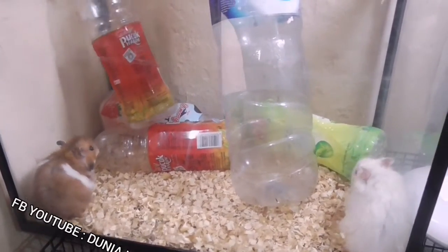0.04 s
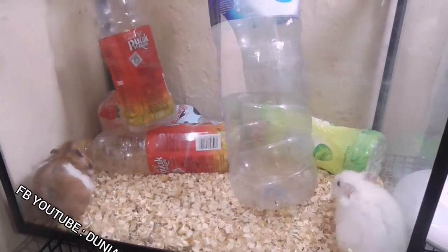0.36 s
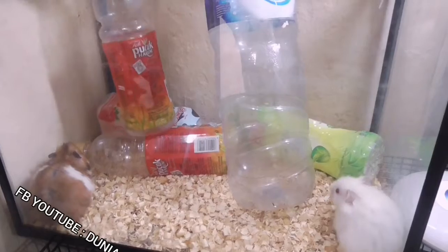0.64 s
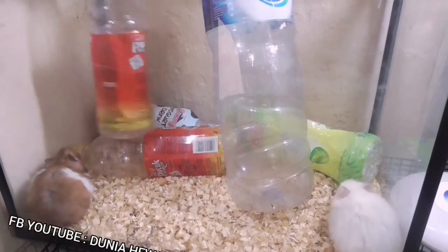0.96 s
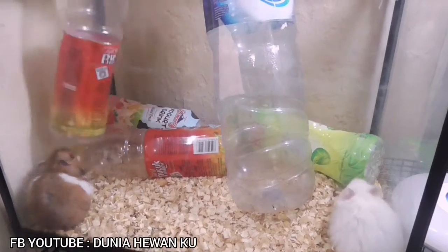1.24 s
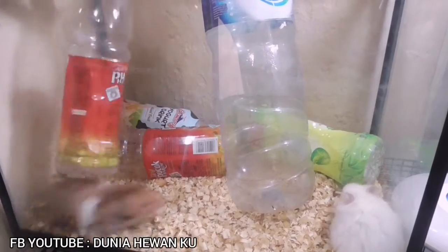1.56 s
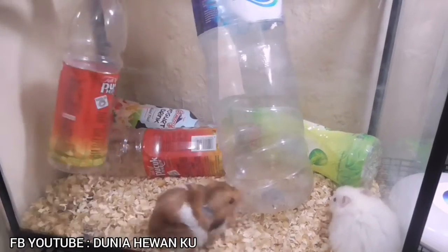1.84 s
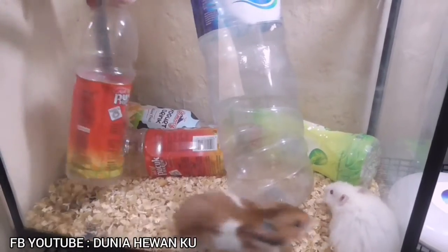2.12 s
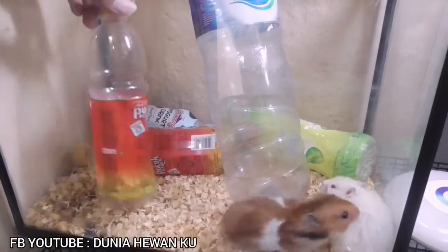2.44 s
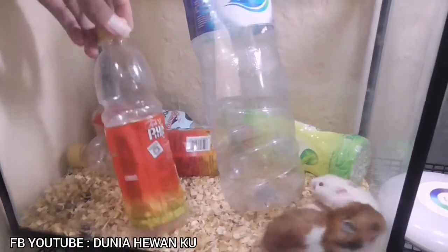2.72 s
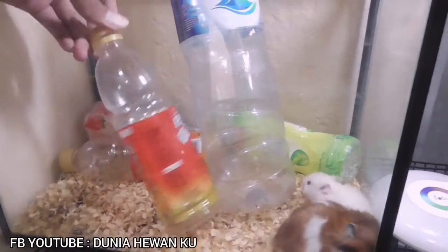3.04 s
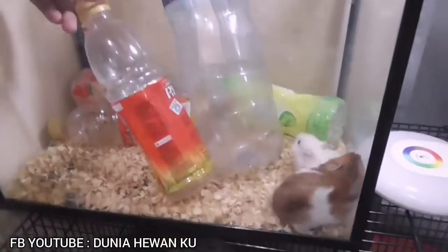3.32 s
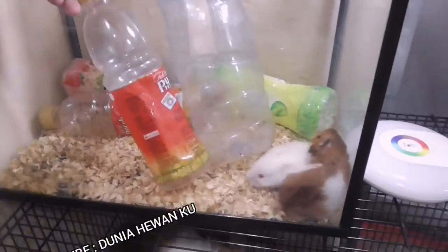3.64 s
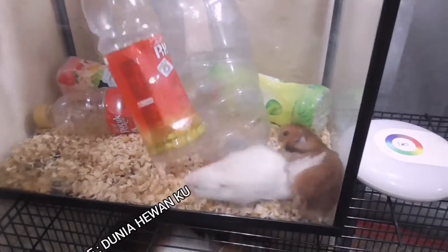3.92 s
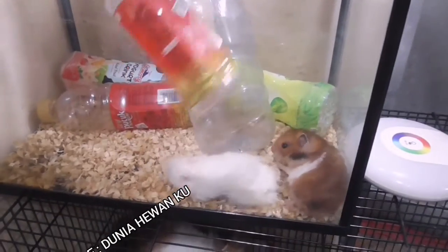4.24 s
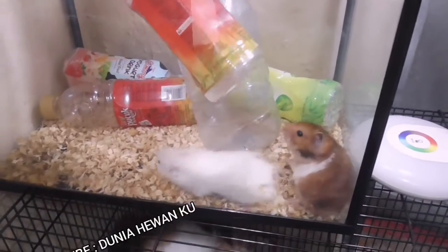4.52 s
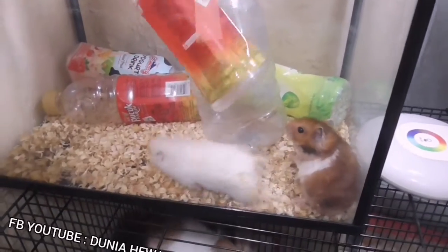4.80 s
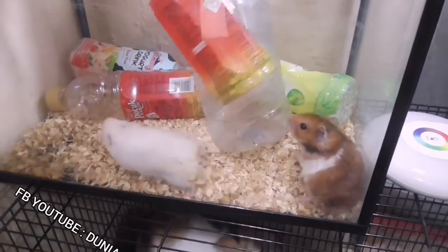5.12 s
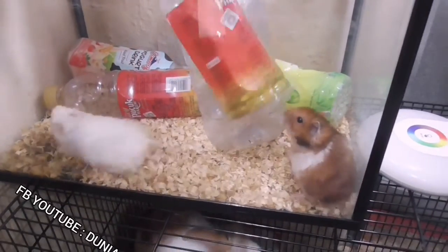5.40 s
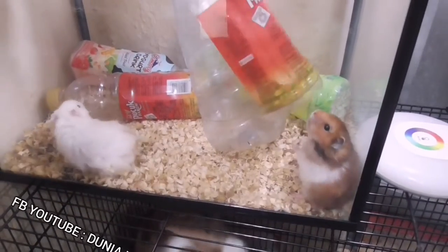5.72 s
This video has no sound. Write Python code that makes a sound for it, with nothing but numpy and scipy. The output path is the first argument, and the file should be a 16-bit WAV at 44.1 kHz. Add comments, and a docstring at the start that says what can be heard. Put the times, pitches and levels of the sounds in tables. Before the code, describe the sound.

Hollow plastic bottle knocks come in short chattering clusters inside a glass tank, while hamsters faintly scuff through shavings in a quiet room.

```python
"""Hollow knocks and chatter: an empty plastic bottle hits other bottles and the wall of a small glass tank.
Each blow clacks the thin plastic, rings a hollow note and booms in the tank; between blows the bottles rub.
Hamsters scurry through wood shavings in short crackles, over a quiet room with low hum and hiss.
A few faint puffs of narrow-band noise thin to a tone as they fade."""
import sys
import numpy as np
from scipy import signal
from scipy.fft import rfft, irfft, next_fast_len
from scipy.io import wavfile
from scipy.ndimage import uniform_filter1d

SR = 44100
rng = np.random.default_rng(int(sys.argv[2]) if len(sys.argv) > 2 else 0)


def transcribe(u):
    """Save the signal u as a 16-bit wav file named by the first command-line argument.

    u: samples, shape (n,) or (channels, n), limited to [-1, 1]; the rate is SR.
    q: integer samples, one column per channel.
    """
    v = np.clip(np.atleast_2d(u).T, -1, 1)
    q = np.round(v * 32767).astype(np.int16)
    wavfile.write(sys.argv[1], SR, q)


N = 254004
T = np.arange(N) / SR
LN_1000 = np.log(1000)  # 60 dB of decay

# low hum: time_s, level_db
HUM_LEVEL = [(0, -55), (.5, -59), (.9, -51.5), (2.4, -48.5), (2.65, -56.5), (5.76, -61.5)]
# room air: freq_hz, gain_db
AIR_SPECTRUM = [(20, -33.5), (45, -10), (70, -10.5), (95, -5.5), (135, -1.5), (200, 3), (235, -12),
                (272, 1), (330, -8.5), (420, -14), (495, -3.5), (600, -21.5), (1050, -18), (2000, -37)]
# hiss: freq_hz, gain_db
HISS_SPECTRUM = [(500, -33), (2000, -2.5), (3300, -7.5), (4200, -3.5), (4650, 1), (5200, -12), (6300, -8.5),
                 (7800, 1), (10000, 1), (12500, -3.5), (15500, -7.5)]
# puffs of narrow-band noise: start_s, pitch_hz, level_db, t60_s
NOISE_PUFFS = [(0.0, 2910, -72, 2.1), (.645, 3030, -60.5, 0.83), (1.15, 9000, -68, 0.6),
               (2.707, 2400, -62.5, 0.94), (2.927, 2410, -55.5, 0.62), (2.929, 3560, -60, 0.38),
               (3.741, 2315, -60, 1.47), (4.254, 7060, -58.5, 0.58), (4.78, 2730, -57.5, 0.78)]
# paw scuffs: start_s, level_db, length_s
PAW_SCUFFS = [(0.274, -55.5, 0.022), (0.996, -59, 0.017), (1.54, -47, 0.024), (1.606, -48.5, 0.046),
              (1.667, -51, 0.025), (1.731, -47.5, 0.017), (1.786, -50, 0.01), (1.809, -46, 0.018),
              (2.366, -56.5, 0.018), (3.07, -60.5, 0.078), (3.544, -57, 0.016), (3.656, -58.5, 0.02),
              (4.194, -54.5, 0.0063), (5.09, -57, 0.011), (5.27, -58, 0.011)]
# wood shavings: freq_hz, gain_db
SHAVINGS_SPECTRUM = [(400, 10), (1200, 10.5), (2200, -1.5), (4200, -0.5), (6000, -3), (8500, 3),
                     (12000, -2.5), (15500, -12.5)]
# how hard the bottles rub: time_s, level_db
RUB_LEVEL = [(0, -48.5), (.5, -52.5), (1.04, -54), (1.2, -67), (1.6, -42.5), (1.8, -50), (2.2, -48),
             (2.6, -65.5), (2.9, -49), (3.25, -46), (3.72, -52.5), (4.03, -41.5), (4.2, -51.5),
             (4.35, -46.5), (4.6, -77), (5.05, -48.5), (5.3, -54.5), (5.75, -54)]
# rubbing plastic: freq_hz, gain_db
RUB_SPECTRUM = [(60, -29), (140, -2.5), (280, 12), (520, -3.5), (660, -5), (900, -2.5), (1300, -12),
                (1900, -27), (4000, -28), (9000, -34), (15000, -33)]
# stereo side against middle: freq_hz, gain_db
SIDE_SPECTRUM = [(30, 1), (80, -18), (300, -14), (600, -5), (1000, -6.5), (2000, -5.5), (4000, -2.5),
                 (8000, -9), (12000, -21)]
# reverberation: freq_hz, gain_db
REVERB_SPECTRUM = [(60, -19), (150, -5), (300, -12.5), (600, -12), (1000, -10), (2000, -9), (5000, -4),
                   (12000, -2.5)]
# reverberation decay: freq_hz, t60_s
REVERB_DECAY = [(120, 0.27), (400, 0.56), (1000, 0.43), (3000, 0.39), (12000, 0.25)]
# snaps of thin plastic: start_s, pitch_hz, level_db, t60_s
PLASTIC_SNAPS = [(0.312, 3310, -55, 0.038), (1.012, 890, -43, 0.08), (1.2686, 720, -12, 0.041),
                 (1.3459, 728, -20, 0.039), (1.79, 2310, -49, 0.054), (1.821, 4250, -48, 0.045),
                 (1.907, 4220, -54, 0.06), (2.769, 1336, -40, 0.046), (3.072, 1363, -43, 0.11),
                 (3.098, 1454, -43, 0.087), (3.098, 780, -35, 0.075), (4.024, 929, -35, 0.044),
                 (4.375, 632, -36.5, 0.082), (5.1, 4980, -50, 0.024), (5.199, 1210, -47.5, 0.082)]
# air in the tank: freq_hz, level_db, t60_s
TANK_MODES = [(140.6, -14.5, 0.96), (173, -9, 0.095), (205, -16, 0.84), (274.4, -2.5, 0.31),
              (339.4, 1, 0.38), (384, -8, 0.46), (450.1, -2.5, 0.17), (522.5, -3, 0.26), (613, -4, 0.062),
              (788, -18, 0.29), (868, -38, 1.28), (1030, -27, 0.11), (1161, -18, 0.11)]
# how the tank passes the bass of a blow: freq_hz, gain_db
TANK_BASS = [(35, 10.5), (65, -9), (95, -7.5), (130, -0.5), (200, -0.5)]
# thin bottle wall: freq_hz, level_db, t60_s
WALL_MODES = [(215.6, -8.5, 0.094), (302.4, 5.5, 0.049), (367, 7, 0.03), (502.2, -3.5, 0.11),
              (629, -7, 0.03), (665, -5.5, 0.029), (738, -8, 0.05), (773, -25, 0.33), (891.3, -11, 0.078),
              (1001, -23.5, 0.125), (1238, -24.5, 0.076), (1396, -39.5, 0.25), (1548, -37, 0.14)]
# contact tick: freq_hz, gain_db
TICK_SPECTRUM = [(600, -9.5), (1500, 17.5), (2400, 5.5), (3500, 5), (6000, 0.5), (8500, 3), (11000, 0.5),
                 (15500, -25.5)]
# bottle blows: start_s, clack_db, hardness_db_per_octave, boom_db, note_hz, note_db, tick_db,
# rattle_db, rattle_s, first_gap_s
BLOWS = [(0.042, -48, 5.5, -41.5, 381.6, -44, -57, -37.5, 0.058, 0.0165),
         (1.019, -48, 1, -45.5, 273, -50, -75, -55, 0.049, 0.026),
         (1.2677, -9, -1.5, -11.5, 282, -14.5, -40, -17, 0.024, 0.012),
         (1.3456, -13, -2.5, -15, 275, -13.5, -44.5, -19.5, 0.021, 0.012),
         (1.375, -24.5, 7.5, -33.5, 343.3, -13, -52, -28, 0.017, 0.022),
         (1.427, -22, -7, -35, 154, -21, -67, -35, 0.02, 0.024),
         (1.5585, -30, 7.2, -55, 536.7, -34, -67, -32.5, 0.081, 0.023),
         (1.817, -19, 5, -46.5, 332, -16, -50, -35.5, 0.057, 0.0071),
         (1.906, -24, 2.5, -38.5, 194.6, -26.5, -51, -26, 0.052, 0.0092),
         (2.165, -40, 3, -49, 267, -40.5, -53.5, -51.5, 0.11, 0.0089),
         (2.6617, -9.5, 0, -16.5, 385, -9.5, -41, -24, 0.048, 0.018),
         (2.769, -22, -0.5, -33, 367, -20.5, -53, -28, 0.016, 0.011),
         (2.8041, -22.5, -2, -33.5, 331, -26.5, -58, -22.5, 0.038, 0.024),
         (2.849, -36.5, 4.5, -32.5, 379, -21, -55, -38, 0.02, 0.01),
         (2.9478, -49, -1, -55, 383, -34.5, -55, -51.5, 0.023, 0.015),
         (3.0855, -34.5, 10, -40, 238.8, -32, -54, -46, 0.085, 0.038),
         (3.159, -48, -14, -43.5, 216, -27, -58, -35, 0.021, 0.027),
         (3.1947, -20, 3.5, -19.5, 159.3, -17, -40.5, -17.5, 0.02, 0.01),
         (3.22, -16.5, 4, -24, 375.2, -17.5, -57, -37, 0.015, 0.0088),
         (3.242, -21, -1.5, -28.5, 275, -24, -74, -27.5, 0.012, 0.0146),
         (3.3234, -40, -2.5, -36, 283.4, -30, -69, -37.5, 0.012, 0.0101),
         (3.5596, -47, 19, -46, 279.6, -35, -50.5, -51, 0.018, 0.019),
         (4.023, -34.5, 9, -40, 271.7, -29.5, -52, -44, 0.013, 0.0145),
         (4.307, -46, 6, -63, 276.4, -35, -72, -56, 0.017, 0.02),
         (4.3747, -34, -2.5, -46, 272, -23, -63, -35, 0.0097, 0.024),
         (4.8628, -33.5, 14, -21, 198, -24, -43.5, -24, 0.012, 0.019),
         (4.8771, -26, -6, -28.5, 278, -18, -57, -22, 0.021, 0.0083),
         (4.8942, -18, 2, -50, 137.2, -20, -64, -23.5, 0.023, 0.0116),
         (5.1963, -41.5, 11, -70, 157, -45, -51.5, -44, 0.031, 0.015)]


def amp(db):
    return 10 ** (np.asarray(db) / 20)


def unit_rms(x):
    return x / np.sqrt(np.mean(x ** 2) + 1e-20)


def decay(t, t60_s):
    return np.exp(-LN_1000 * t / t60_s)


def at_hz(table, hz):
    """Table lookup on a log-frequency axis."""
    freq_hz, value = np.transpose(table)
    return np.interp(np.log(hz + 1), np.log(freq_hz + 1), value)


def envelope(curve):
    """Gain over time from rows of time_s, level_db."""
    return amp(np.interp(T, *np.transpose(curve)))


def add(mix, start_s, sound):
    part = mix[..., max(round(start_s * SR), 0):][..., :sound.shape[-1]]
    part += sound[..., :part.shape[-1]]


def colour(x, spectrum):
    """Filter by rows of freq_hz, gain_db."""
    size = x.shape[-1]
    padded = next_fast_len(size + 4096)
    gain = amp(at_hz(spectrum, np.fft.rfftfreq(padded, 1 / SR)))
    return irfft(rfft(x, padded) * gain, padded)[..., :size]


def spread(pair):
    """Middle and side to left and right."""
    side = colour(pair[1], SIDE_SPECTRUM)
    return np.array([pair[0] + side, pair[0] - side])


def noise(spectrum):
    return unit_rms(spread(colour(rng.standard_normal((2, N)), spectrum)))


def grains(spectrum, rate_per_s, spread_db):
    """Dense tiny clicks of uneven size."""
    size = amp(spread_db * np.minimum(rng.exponential(1, (2, N)), 4))
    clicks = size * rng.standard_normal((2, N)) * (rng.random((2, N)) < rate_per_s / SR)
    return unit_rms(spread(colour(clicks, spectrum)))


def ring(t, hz, t60_s, rise_s):
    """One mode: builds up, dies away."""
    return np.sin(2 * np.pi * hz * t) * decay(t, t60_s) * (1 - np.exp(-t / rise_s))


def background(hum_hz=92.3, waver_rms_hz=4):
    """Wavering hum, room air coloured by the tank, hiss."""
    freq_hz = np.fft.rfftfreq(N, 1 / SR)
    waver = unit_rms(irfft(rfft(rng.standard_normal(N)) / (1 + (freq_hz / 6) ** 4), N))
    hum = np.sin(2 * np.pi * np.cumsum(hum_hz + waver_rms_hz * waver) / SR)
    air = signal.sosfilt(signal.butter(4, 2200, fs=SR, output="sos"), noise(AIR_SPECTRUM))
    return envelope(HUM_LEVEL) * hum + amp(-51.5) * air + amp(-66.5) * noise(HISS_SPECTRUM)


def noise_puffs(rise_s=0.012, thinning_s=0.09):
    """Faint puffs of narrow-band noise that thin to a tone as they fade."""
    out, t = np.zeros((2, N)), T[:SR]
    freq_hz = np.fft.rfftfreq(SR, 1 / SR)
    wide_share = np.exp(-t / thinning_s)
    for start_s, pitch_hz, level_db, t60_s in NOISE_PUFFS:
        half_widths_hz = np.array([280.5, 92.4]) * (pitch_hz / 2510) ** 2.1  # higher is wider
        white = rfft(rng.standard_normal((2, SR)))
        wide, thin = (unit_rms(irfft(white / (1 + ((freq_hz - pitch_hz) / half_hz) ** 2), SR))
                      for half_hz in half_widths_hz)
        puff = np.sqrt(wide_share) * wide + np.sqrt(1 - wide_share) * thin
        fade = (1 - np.exp(-t / rise_s)) * decay(t, t60_s)
        add(out, start_s, amp(level_db) * fade * puff)
    return spread(out)


def scurrying(stir_db=-72.5, swing_db=2.6, swell_s=0.039):
    """Paws push shavings aside in crackling scuffs and stir them faintly in between."""
    swell = np.interp(T / swell_s, np.arange(SR), rng.standard_normal(SR))
    push = amp(stir_db + swing_db * swell)
    for start_s, level_db, length_s in PAW_SCUFFS:
        age = T[:SR // 2] / (length_s / 2)
        add(push, start_s, amp(level_db) * age * np.exp(1 - age))
    return push * grains(SHAVINGS_SPECTRUM, rate_per_s=3000, spread_db=3)


def rubbing():
    """Plastic slips in tiny catches as the bottle is steered about."""
    return envelope(RUB_LEVEL) * grains(RUB_SPECTRUM, rate_per_s=1400, spread_db=2.2)


def room_reverb(x, taps_per_s=3000, predelay_s=0.004):
    """Sparse reflections of random sign; each band dies at its own rate."""
    taps = rng.choice([-1., 1.], (2, SR)) * (rng.random((2, SR)) < taps_per_s / SR)
    taps[:, :int(predelay_s * SR)] = 0
    hz, t, bands = signal.stft(taps, SR, nperseg=256)
    tail = signal.istft(bands * decay(t, at_hz(REVERB_DECAY, hz)[:, None]), SR, nperseg=256)[1]
    tail = spread(colour(tail / np.linalg.norm(tail[0]), REVERB_SPECTRUM))
    return signal.fftconvolve(x[None], tail, axes=1)[:, :N]


def glass_reflection(x, delay_s=0.0021):
    """Direct sound plus a quick echo off the side glass, unequal left and right."""
    echo = np.zeros(N)
    add(echo, delay_s, amp(-7) * x)
    return spread(np.array([x, echo]))


def snaps(roughness=0.68):
    """Stiff patches of plastic give way and buzz briefly."""
    out = np.zeros(N)
    for start_s, pitch_hz, level_db, t60_s in PLASTIC_SNAPS:
        add(out, start_s, amp(level_db) * ring(T[:SR // 4], pitch_hz, t60_s, rise_s=0.00078))
    flutter = unit_rms(uniform_filter1d(rng.standard_normal(N), size=60))
    flutter = signal.sosfiltfilt(signal.butter(4, 300, fs=SR, output="sos"), flutter)
    return out * (1 + roughness * flutter)


def rebounds(rattle_s, first_gap_s, count=8, gap_ratio=0.92, fade_db=6.5, scatter_db=1.7):
    """Chatter after a blow, ever quicker and weaker: rows of delay_s, gain."""
    delay_s = np.cumsum(first_gap_s * gap_ratio ** np.arange(count))
    level_db = scatter_db * rng.standard_normal(count) - fade_db * (delay_s / rattle_s) ** 2
    return zip(delay_s, amp(level_db))


def hollow_note(t, start_s, pitch_hz, rattle_s, free_t60_s=0.2, damping_t60_s=0.49):
    """Chatter pumps the bottle's note up and holds it; a later contact adds damping."""
    note = ring(t, pitch_hz, free_t60_s, rise_s=0.28 * rattle_s)
    hold = 1 / decay(np.minimum(t, 0.67 * rattle_s), free_t60_s)
    free_s = min([blow[0] - start_s for blow in BLOWS if blow[0] > start_s + 0.04] + [1])
    return note * hold * decay(np.maximum(t - free_s, 0), damping_t60_s)


def knocks(rebound_boom_db=-7.5, rebound_tick_db=-20, low_cut_hz=120):
    """Blows clack the wall, ring note and tank, then chatter. Returns mono body, stereo ticks."""
    t = T[:int(0.7 * SR)]
    boom = sum(amp(db) * ring(t, hz, t60_s, rise_s=0.0047) for hz, db, t60_s in TANK_MODES)
    wall = np.array([amp(db) * ring(t, hz, t60_s, rise_s=0.0016) for hz, db, t60_s in WALL_MODES])
    wall_octaves = np.log2(np.array(WALL_MODES)[:, 0] / 500)
    tick = (np.exp(-t / 0.0084) + 0.24 * np.exp(-t / 0.022)) * (1 - np.exp(-t / 0.0017))
    body, contact = np.zeros(N), np.zeros(N)
    for (start_s, clack_db, hardness_db_per_octave, boom_db, note_hz, note_db, tick_db,
         rattle_db, rattle_s, first_gap_s) in BLOWS:
        clack = amp(hardness_db_per_octave * wall_octaves) @ wall  # harder favours higher modes
        add(body, start_s, amp(clack_db) * clack + amp(boom_db) * boom)
        add(body, start_s, amp(note_db) * hollow_note(t, start_s, note_hz, rattle_s))
        add(contact, start_s, amp(tick_db) * tick)
        rebound = amp(rattle_db) * (clack + amp(rebound_boom_db) * boom)
        for delay_s, gain in rebounds(rattle_s, first_gap_s):
            add(body, start_s + delay_s, gain * rebound)
            add(contact, start_s + delay_s, gain * amp(tick_db + rebound_tick_db) * tick)
    # light bottles radiate little bass
    body = signal.sosfilt(signal.butter(2, low_cut_hz, "high", fs=SR, output="sos"), body)
    ticks = contact * grains(TICK_SPECTRUM, rate_per_s=12000, spread_db=1.5)
    return colour(body, TANK_BASS), ticks


def scene():
    body, ticks = knocks()
    body = body + snaps()
    crackle = ticks + scurrying()
    reverb = room_reverb(body + crackle.mean(0))
    return glass_reflection(body) + crackle + reverb + rubbing() + noise_puffs() + background()


def record(dry, lean_db=0.17, cutoff_hz=15700):
    """Slight lean to the left, then a low-pass."""
    balance = amp([[lean_db], [-lean_db]])
    lowpass = signal.firwin(511, cutoff_hz, window=("kaiser", 9), fs=SR)
    return signal.oaconvolve(dry * balance, lowpass[None], "same")


dry = scene()
out = record(dry)
transcribe(out)
```